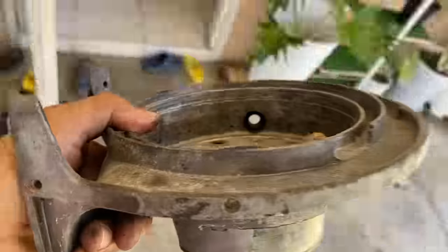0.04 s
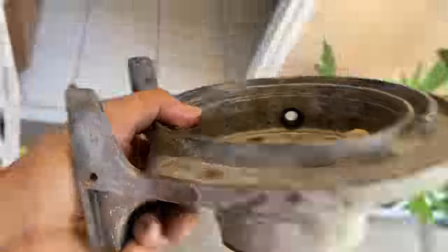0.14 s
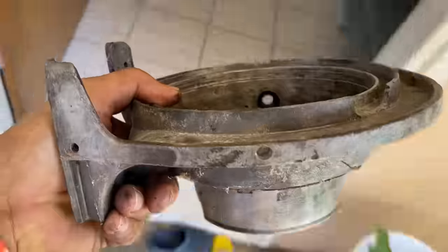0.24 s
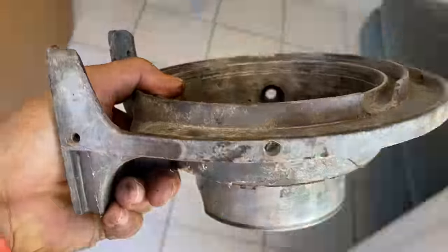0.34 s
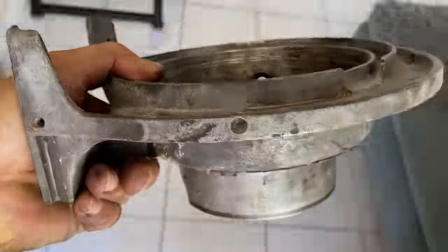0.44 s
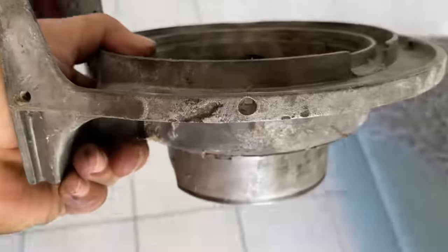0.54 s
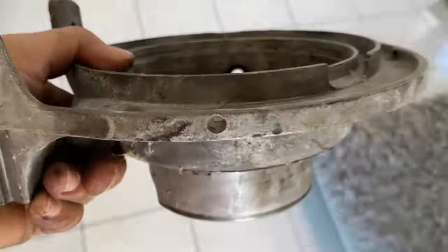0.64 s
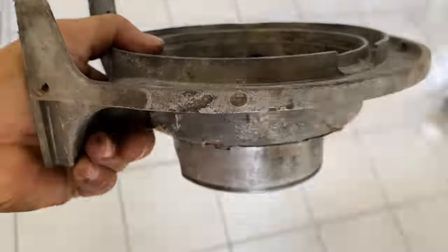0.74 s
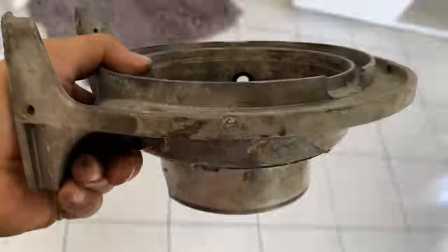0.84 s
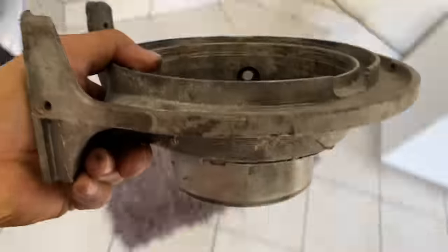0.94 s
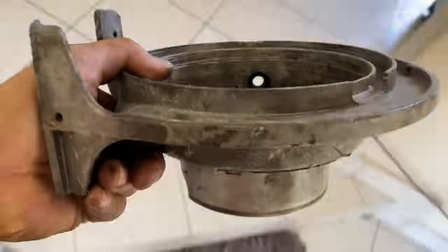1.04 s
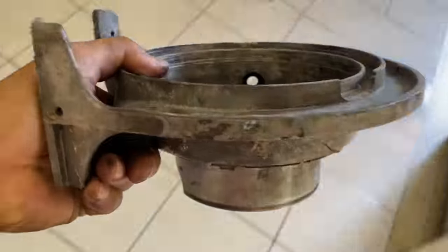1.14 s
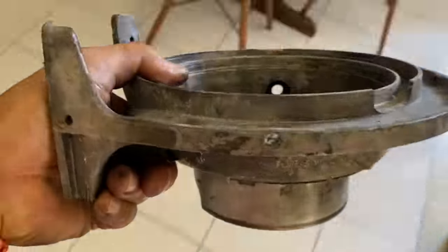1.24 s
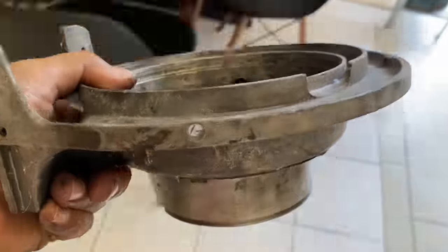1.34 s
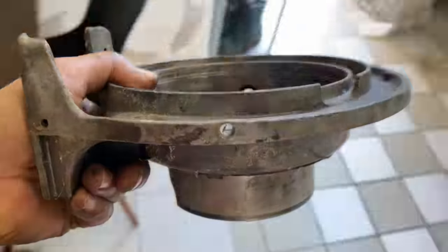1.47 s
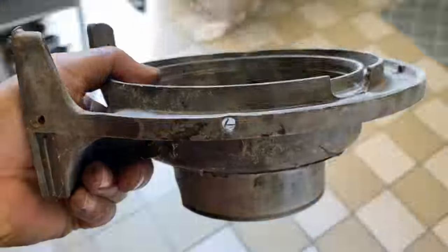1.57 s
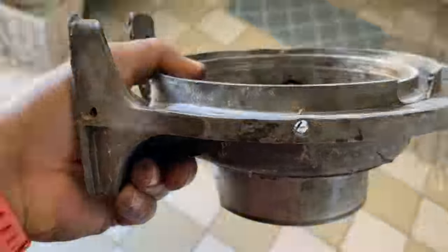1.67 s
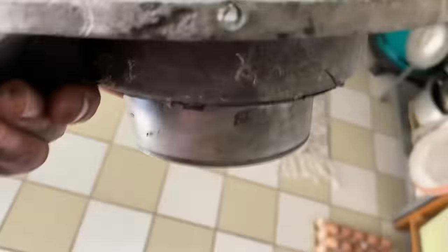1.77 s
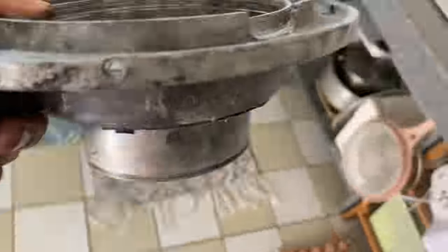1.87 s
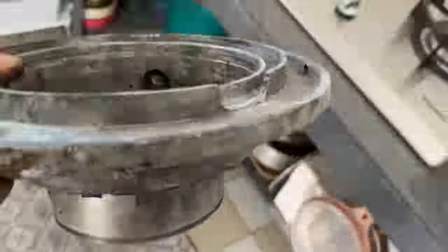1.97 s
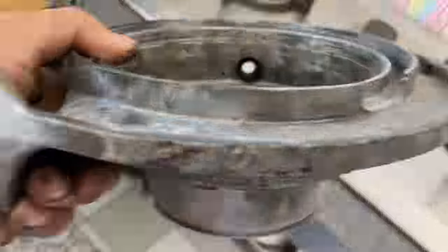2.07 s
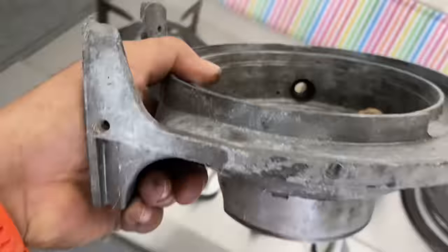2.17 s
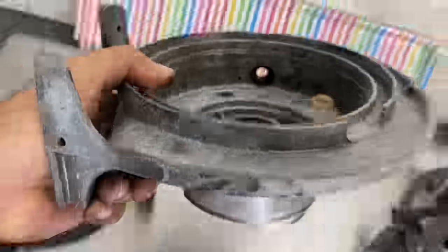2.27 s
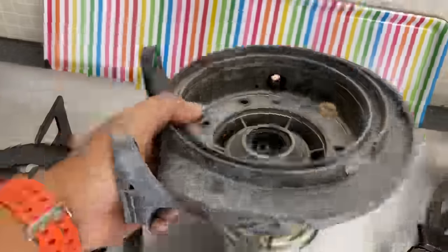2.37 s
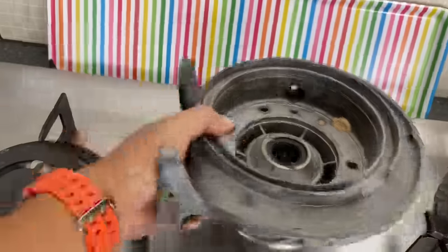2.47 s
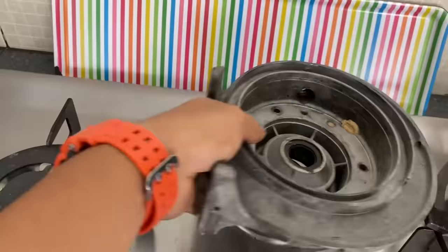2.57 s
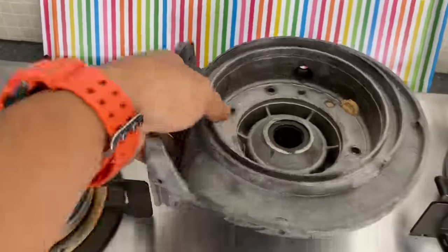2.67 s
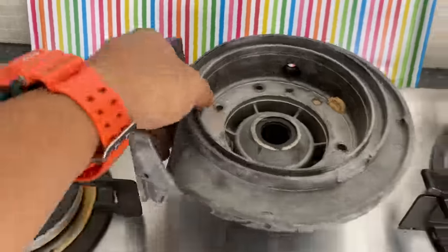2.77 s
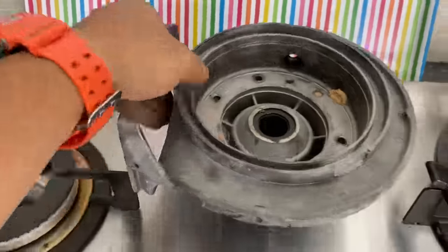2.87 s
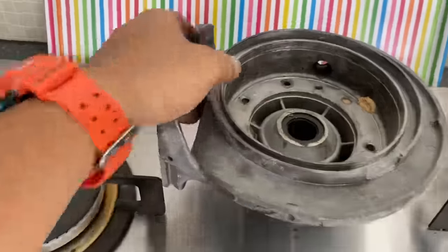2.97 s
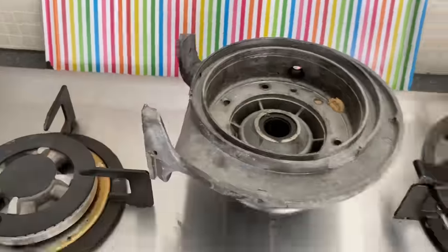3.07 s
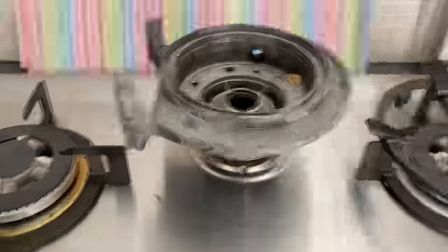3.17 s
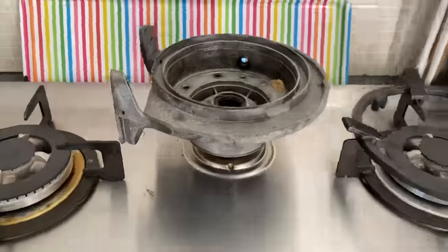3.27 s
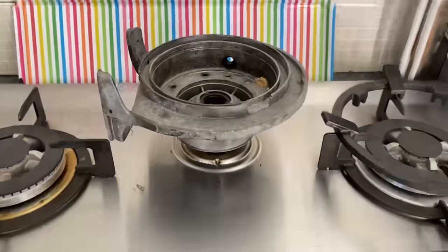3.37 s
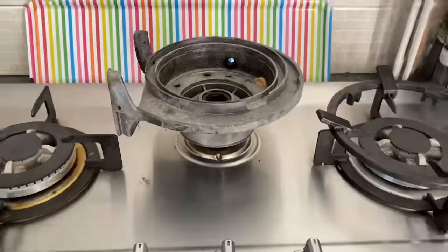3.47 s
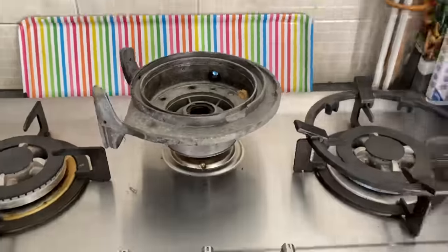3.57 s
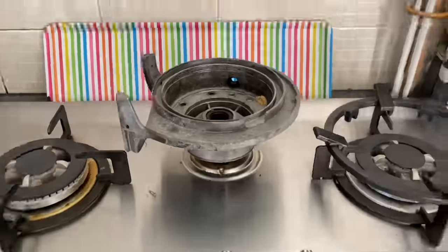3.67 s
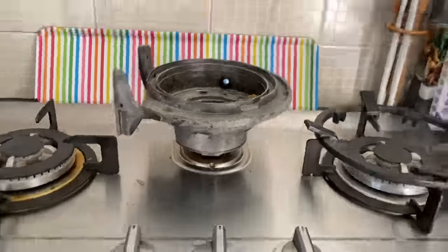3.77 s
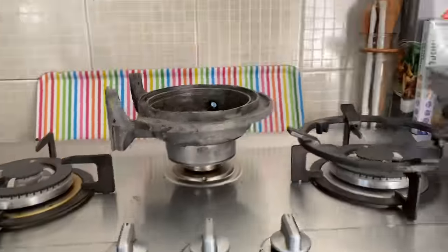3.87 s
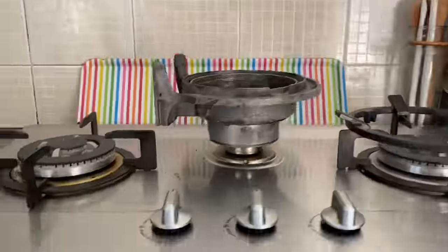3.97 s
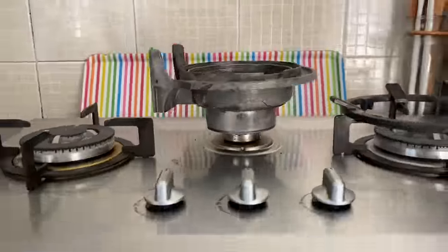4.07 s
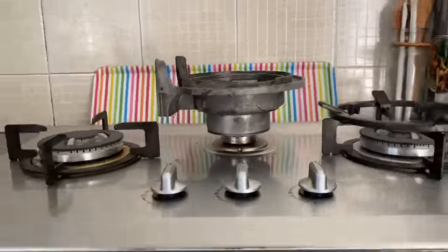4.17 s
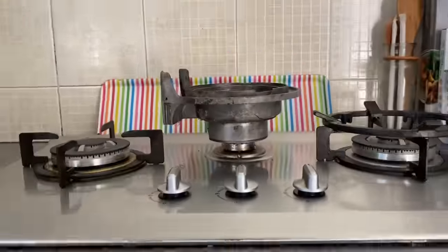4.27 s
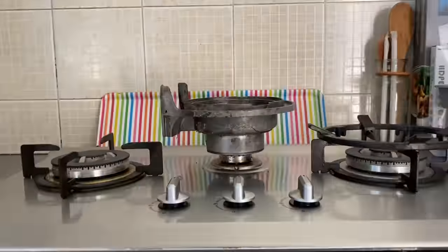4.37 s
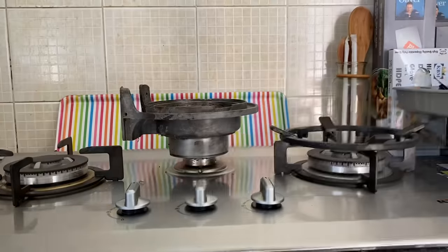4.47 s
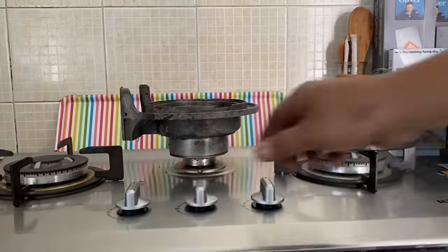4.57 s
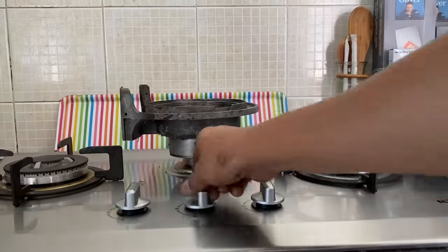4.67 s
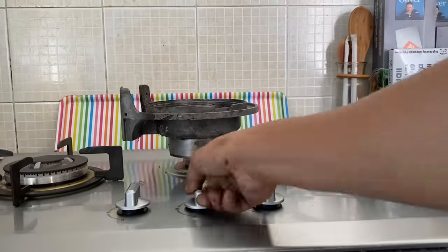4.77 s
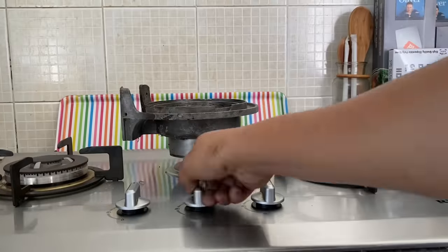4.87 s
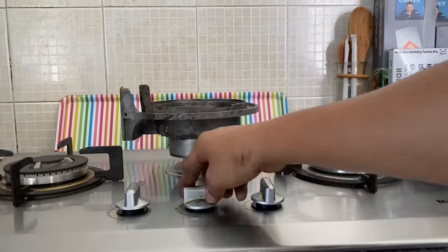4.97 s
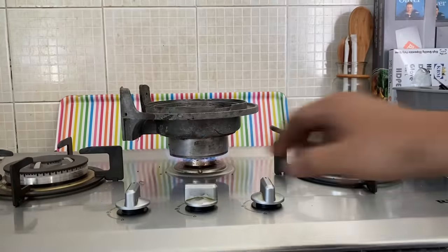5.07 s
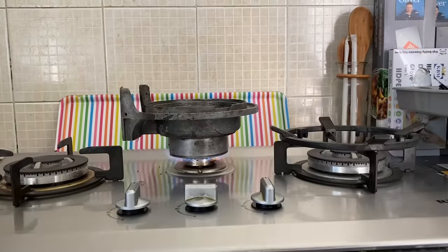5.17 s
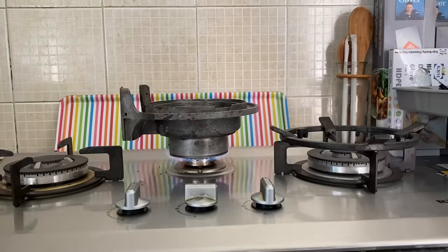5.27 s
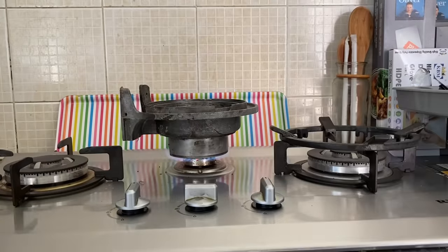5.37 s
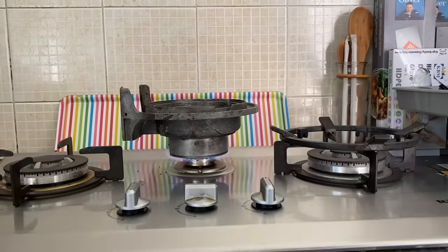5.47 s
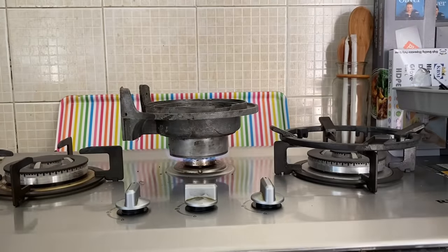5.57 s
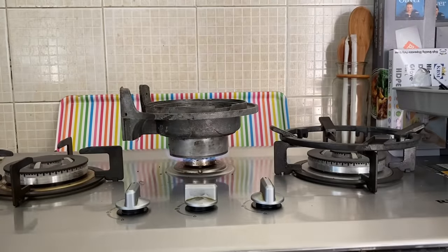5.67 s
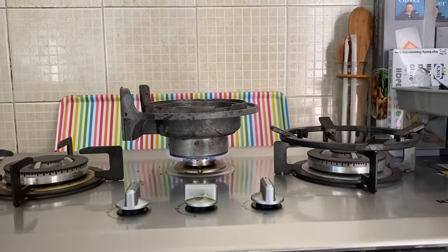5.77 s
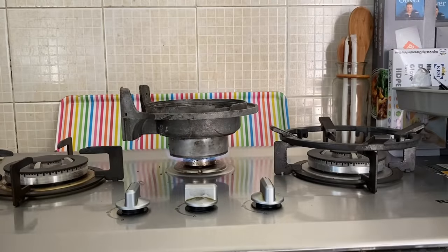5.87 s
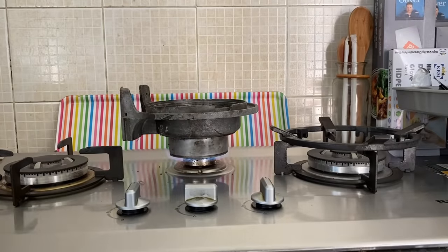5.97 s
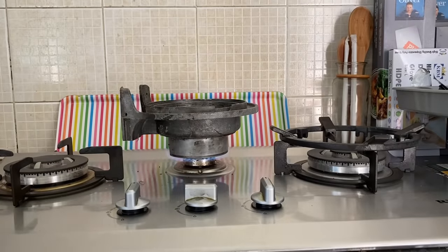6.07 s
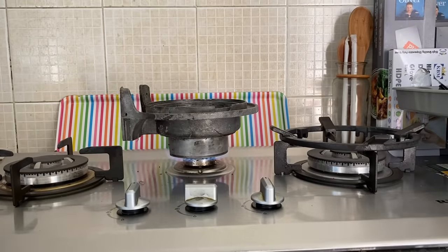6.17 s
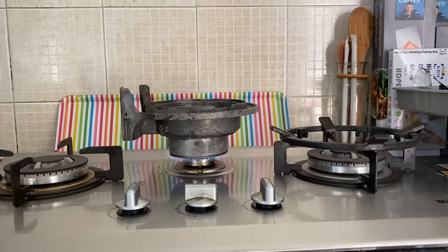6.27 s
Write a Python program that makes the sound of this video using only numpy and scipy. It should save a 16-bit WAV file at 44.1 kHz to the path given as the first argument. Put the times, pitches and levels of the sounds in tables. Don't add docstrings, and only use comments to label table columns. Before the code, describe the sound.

Close handheld phone sound, sped up. Slippers scuff, squeak and thud softly while clothes rustle, from a hallway into a tiled kitchen with a low appliance hum. A heavy cast metal part lands on a steel hob with a double booming clank, grinding and rocking briefly. After faint sleeve rustles, a knob is pressed and turned: hard panel-ringing clicks, spark snaps, then a very faint steady gas hiss.

```python
import sys
import numpy as np
from scipy import signal
from scipy.fft import rfft, irfft
from scipy.io import wavfile
from scipy.ndimage import uniform_filter1d, map_coordinates

SR = 44100
rng = np.random.default_rng(int(sys.argv[2]) if len(sys.argv) > 2 else 0)


def voltage_ratio(level):
    return 10 ** (np.asarray(level, float) / 20)


def generate_wav(signal):
    frames = np.transpose(np.atleast_2d(signal))
    scaled = np.clip(frames, -1, 1) * 32767
    pcm = np.round(scaled).astype(np.int16)
    wavfile.write(sys.argv[1], SR, pcm)


N = 278712
T = np.arange(N) / SR
KITCHEN_S = 1.2


def unit(x):
    return x / np.sqrt(np.mean(x ** 2) + 1e-20)


def slope(points):
    f, v = np.transpose(points)
    return lambda hz: voltage_ratio(np.interp(np.log(hz + 1), np.log(f + 1), v, left=-120, right=-120))


def modes(peaks):
    def gain(f):
        total = 0
        for k, (centre, width, db) in enumerate(peaks):
            damping = 1j * f * width
            total = total + (-1) ** k * voltage_ratio(db) * damping / (centre * centre - f * f + damping)
        return total
    return gain


def noise(gain, patchy_db, alike=0):
    hz, _, z = signal.stft(rng.standard_normal((2, N)), SR, nperseg=1024)
    z = z + alike * z[::-1]
    field = uniform_filter1d(rng.standard_normal(z.shape[1:]), 9, 0)
    field = uniform_filter1d(field, 2, 1)
    patches = voltage_ratio(patchy_db * unit(field))
    coloured = signal.istft(z * gain(hz)[:, None] * patches, SR, nperseg=1024)[1]
    return unit(coloured[:, :N])


def wobble(rate):
    return map_coordinates(rng.standard_normal(int(N * rate / SR) + 4), [T * rate])


def grain():
    return unit(voltage_ratio(2 * wobble(500)))


def smear(s, length, rise):
    first = max(round((s - 0.04) * SR), 0)
    t = T[first:first + SR // 5] - s
    length = max(length, 0.003)
    before = np.exp(-(t / (rise * length)) ** 2)
    after = np.exp(-(np.abs(t) / length) ** 1.46)
    return first, np.where(t < 0, before, after)


def bursts(times, levels_db, lengths, rise, pan_db=0):
    env = np.zeros((2, N))
    sides_db = np.array([[pan_db / 2], [-pan_db / 2]])
    for s, db, length in zip(times, levels_db, lengths):
        first, shape = smear(s, length, rise)
        env[:, first:first + len(shape)] += voltage_ratio(db + sides_db) * shape
    return env


def tones(times, levels_db, pitches_hz, lengths, rise, slip):
    out = np.zeros((2, N))
    lead = slip / 2 * rng.choice([-1, 1], len(times))
    for s, db, hz, length, half in zip(times, levels_db, pitches_hz, lengths, lead):
        first, shape = smear(s, length, rise)
        t = T[first:first + len(shape)] - s
        phase = 2 * np.pi * hz * t + np.array([[half], [-half]])
        out[:, first:first + len(shape)] -= voltage_ratio(db) * shape * np.cos(phase)
    return out


def linger(times, levels_db, length):
    power = sum(bursts([s], [db], [length], rise=0.33) ** 2 for s, db in zip(times, levels_db))
    return np.sqrt(power)


def microphone():
    return voltage_ratio(-98.5) * rng.standard_normal((2, N))


# pitch_hz, level_db
WHINE = [(6142, -88.5)]


def whine():
    (whine_hz, whine_db), = WHINE
    drift = 2.2 * np.array([wobble(45), wobble(45)])
    level_db = whine_db + 7 - 12 * (T < KITCHEN_S) + 1.8 * wobble(14)
    return voltage_ratio(level_db) * np.sin(2 * np.pi * whine_hz * T + drift)


# pitch_hz, level_db (per Hz)
HALL = [(200, -40), (300, -2), (450, 0), (700, -8), (1100, -25)]


def hall():
    fade = np.clip((KITCHEN_S - T) / 0.27, 0, 1)
    return voltage_ratio(-67.5) * fade * noise(slope(HALL), patchy_db=2)


# pitch_hz, level_db (per Hz)
HUM = [(35, -45), (60, -13), (101, -5.5), (129, -10), (199, -4.5), (271, -10.5), (314, -19.5), (412, -15.5),
       (452, -16.5), (497, -22.5), (725, -25.5), (796, -24.5), (1500, -40.5), (1950, -76), (3300, -120)]
# start_s, level_db
PASSING = [
    (0.0, -60.5),
    (1.17, -56),
    (1.25, -51.5),
    (1.45, -52.5),
    (1.67, -55),
    (6.32, -55),
]


def hum():
    boom, click = np.transpose(BOOMS), np.transpose(CLICKS)
    hit_db = np.r_[boom[1], click[1] + click[2] - 3]
    drone = linger(np.r_[boom[0], click[0]], hit_db - 27, length=0.083)
    house = voltage_ratio(np.interp(T, *np.transpose(PASSING)))
    return (house + drone) * noise(slope(HUM), patchy_db=1.5)


# start_s, level_db (of rustle)
MOTION = [(0.0, -66.5), (0.28, -63.5), (0.39, -61.5), (0.54, -68), (0.69, -75.5), (0.84, -73.5),
          (1.14, -71.5), (1.67, -73), (1.99, -72.5), (2.2, -72), (2.32, -75.5), (3.0, -74), (3.43, -80.5),
          (4.17, -79.5), (4.9, -78), (5.49, -76), (5.76, -79.5), (6.07, -74.5)]
# centre_s, half_length_s, level_db
LULLS = [
    (.69, 0.027, -2),
    (0.81, 0.022, -1.5),
    (0.952, .012, -4),
    (1.074, 0.018, -5.5),
    (1.73, 0.023, -2),
    (1.908, .035, -4.5),
    (2.184, 0.021, -4),
    (3.33, 0.046, -1.5),
]
CALM_DB = -75


def motion():
    over_calm_db = np.interp(T, *np.transpose(MOTION)) - CALM_DB
    for s, half, db in LULLS:
        over_calm_db += db * np.exp(-((T - s) / half) ** 2)
    return over_calm_db


# pitch_hz, level_db (per Hz)
RUMBLE = [(12, -41), (20, -14), (38, -13), (65, -2.5), (87, -5), (130, -21.5), (170, -57.5), (290, -120)]


def rumble(motion_db):
    thud = np.transpose(THUDS)
    sway = linger(thud[0], 0.51 * thud[1] - 38.5, length=0.11)
    return (voltage_ratio(-67 + 0.35 * motion_db) + sway) * noise(slope(RUMBLE), patchy_db=1.5, alike=0.18)


# pitch_hz, level_db (per Hz)
RUSTLE = [(410, -17), (700, -5.5), (894, -9), (1660, -7), (2040, -10), (2830, -10.5), (4000, -13),
          (6010, -13.5), (8000, -25), (10400, -52.5), (17600, -120)]
# pitch_hz, level_db (per Hz)
HISS = [(3820, -41), (6500, -7.5), (7960, -4.5), (9440, -2.5), (11700, -5), (13200, -7.5), (15700, -9)]


def clothes(motion_db):
    clunk, click = np.transpose(CLUNKS), np.transpose(CLICKS)
    rattle = linger(np.r_[clunk[0], click[0]], np.r_[clunk[1], click[1] - 6] - 36, length=0.044)
    flutter = wobble(30)
    rustle_level = voltage_ratio(CALM_DB + motion_db + 4.5) + rattle
    hiss_level = voltage_ratio(-82 + 2.4 * np.minimum(motion_db, 4)) + voltage_ratio(-17.5) * rattle
    rustle = rustle_level * voltage_ratio(0.59 * flutter) * noise(slope(RUSTLE), patchy_db=1.5)
    hiss = hiss_level * voltage_ratio(3.6 * flutter) * noise(slope(HISS), patchy_db=2.2)
    return rustle + hiss


# start_s, level_db (peak), high_db,
# length_s
SCUFFS = [(0.024, -50.5, -8.5, 0.041), (0.114, -47.5, -11, 0.045), (0.219, -46.5, -6.5, 0.027),
          (0.293, -44, -4, 0.022), (0.318, -45.5, -33, 0.019), (0.343, -51.5, -4, .017),
          (0.39, -47, -13, 0.018), (0.395, -40.5, -6, 0.0081), (0.425, -45, -9.5, 0.021),
          (0.52, -48.5, -15, .012), (0.536, -40.5, -11.5, .011), (0.641, -57.5, -5, 0.015),
          (0.741, -49, -15.5, 0.024), (0.834, -50.5, -8.5, 0.013), (0.907, -54.5, -20, 0.028),
          (0.928, -51, -25, 0.012), (0.969, -54, -7, 0.015), (1.018, -50, -5.5, 0.016),
          (1.042, -49, -33, .011), (1.11, -49, -18, 0.012), (1.29, -49, -10.5, 0.027),
          (1.439, -43, -16, 0.014), (1.583, -65, 9, 0.01), (1.6218, -47, -27, 0.014), (1.656, -44, -20, .005),
          (1.226, -55, -15, .01), (1.362, -63, -2, 0.0081), (2.105, -61, -7, .01), (2.329, -59, -12, 0.009),
          (1.687, -49, -20, 0.023), (1.777, -54.5, 1.5, 0.028), (1.84, -52.5, -5.5, 0.021),
          (1.982, -49.5, -13, 0.022), (2.156, -47.5, -14, 0.01), (2.36, -50, -12.5, 0.036),
          (2.263, -58, -5.5, .013), (3.095, -57, -11.5, 0.03), (3.225, -62.5, -5, 0.028),
          (3.264, -59, -4, .009), (3.52, -62, -22, .03), (3.615, -69, -4, 0.014), (3.697, -67, -9, .008),
          (4.12, -65, -27, .05), (5.49, -67, -8, .02), (5.81, -62, -20, 0.032), (3.58, -61, -7.5, 0.033),
          (3.764, -60, -20, 0.047), (3.83, -54.5, -17, 0.021), (3.879, -56.5, -17, 0.02),
          (3.915, -57.5, -14, 0.032), (3.955, -64, -7, 0.023), (4.226, -45, -4, 0.021),
          (4.257, -53.5, -31, .06), (4.302, -43, -5, .016), (4.3874, -56, -31, 0.024),
          (4.514, -65, -5, 0.023), (4.532, -57, -12, 0.031), (4.599, -63, -2, 0.032), (4.678, -61, 4, .02),
          (4.754, -65, -4, 0.011), (6.015, -59, -11, 0.019), (6.053, -46, -16, 0.012),
          (6.098, -51.5, -15.5, 0.043), (6.194, -58, -12, 0.038)]
# start_s, level_db, pitch_hz
SQUEAKS = [(.322, -55.5, 1940), (.345, -53, 3700), (0.318, -54, 2900), (.384, -47, 1300),
           (0.422, -46, 3000), (.426, -48, 3400), (.54, -59, 1750), (.747, -51, 2540), (1.444, -53, 3050),
           (1.99, -53, 2700), (1.912, -63, 11200), (1.693, -53, 1400), (1.785, -50.5, 9700),
           (3.918, -60, 1650), (3, -60, 9600), (1.774, -54, 10400), (4.392, -64, 4300),
           (1.659, -56.5, 3270), (6.115, -59, 2530), (3.51, -70, 9200), (3.203, -69, 3100),
           (3.885, -63, 1680), (3.545, -65, 2800), (6.09, -62, 2450), (1.588, -57, 9400)]
# start_s, level_db (peak), pitch_hz, length_s
THUDS = [(0.403, -48, 53.8, 0.026), (0.593, -47, 80.7, 0.016), (.28, -56, 75, 0.017), (.645, -52, 70, .015),
         (.69, -55, 62, 0.016), (0.861, -53, 70, .012), (.95, -54, 45, .015), (0.901, -44.5, 67, 0.017),
         (1.005, -37, 64.5, 0.012), (1.043, -49, 45.8, 0.014), (1.774, -52, 56, 0.018),
         (2.54, -23.5, 78.5, 0.0098), (2.589, -19, 96, 0.0069), (3.075, -47, 84, 0.022),
         (3.21, -51.5, 60, .04), (3.61, -51, 55, .025), (3.665, -49, 88.8, 0.0081),
         (3.703, -32.5, 87, 0.0077), (4.719, -33.5, 81, 0.014), (4.786, -43.5, 113, 0.016),
         (4.921, -35, 84.4, 0.016), (4.974, -38.5, 62.3, 0.01), (5.027, -30.5, 92, 0.018),
         (5.2, -52.5, 70, 0.019), (.46, -47.5, 50, 0.045), (0.534, -47.5, 66.3, 0.1)]


def steps():
    s, db, high_db, length = np.transpose(SCUFFS)
    s, length = s + 0.0046, 0.82 * length
    scrape = bursts(s, db - 9, length, rise=0.74, pan_db=4) * grain() * noise(slope(RUSTLE), patchy_db=1.5)
    swish = bursts(s, db + high_db - 6.5, length, rise=0.56)
    swish = swish * noise(slope(HISS), patchy_db=2.5, alike=0.072)
    s, db, hz = np.transpose(SQUEAKS)
    squeak = tones(s, db, hz, np.full(len(s), 0.003), rise=1, slip=1.5)
    s, db, hz, length = np.transpose(THUDS)
    thud = tones(s + 0.0011, db + 1.5, hz, length, rise=0.36, slip=0.89)
    return scrape + swish + squeak + thud


# start_s, level_db (peak), pitch_hz, length_s
KNOCKS = [
    (0.025, -56, 452, 0.012),
    (0.194, -53.5, 542, 0.011),
    (0.29, -55.5, 318, 0.023),
    (0.385, -47.5, 510, 0.0081),
    (1.779, -35, 468, 0.0056),
    (3.198, -47, 375, 0.0046),
    (3.433, -52.5, 327, 0.0066),
    (4.499, -46.5, 480, 0.0034),
    (5.134, -57, 400, 0.0081),
]
# pitch_hz, level_db (per Hz)
WOOD = [(350, -40), (600, -15), (1180, -2), (2330, -27), (3230, -13), (4000, -41), (5200, -68),
        (8800, -120)]


def knocks():
    s, db, hz, length = np.transpose(KNOCKS)
    s = s + 0.0025
    edge = bursts(s, db - 15, length, rise=0.9) * noise(slope(WOOD), patchy_db=1.5)
    upper = tones(s, db, hz, length, rise=0.56, slip=0.78)
    lower = tones(s, db - 3, 0.588 * hz, length, rise=0.99, slip=1.5)
    return edge + upper + lower


# start_s, level_db, pitch_hz, length_s
PINGS = [(1.589, -60, 11500, 0.0078), (1.785, -49.5, 11500, 0.0051), (1.784, -50, 1170, 0.0047),
         (1.779, -45, 926, 0.0035), (2.595, -30, 1030, 0.008), (2.598, -42, 7660, 0.0063),
         (2.652, -28.5, 2316, 0.0031), (2.653, -47, 4550, 0.0029), (2.706, -46, 500, 0.0091),
         (2.930, -61, 2810, 0.025), (3.025, -69.5, 5550, 0.014), (3.028, -61, 2060, 0.011),
         (4.384, -63, 1313, 0.025), (5.305, -67, 3260, 0.0073), (4.26, -61, 7050, 0.008),
         (4.258, -64, 14200, .006), (4.633, -48.5, 9500, 0.004), (4.72, -42, 7400, 0.0031),
         (4.984, -24.5, 3150, 0.0049), (4.724, -30.5, 1540, 0.0057), (4.989, -29, 550, 0.0089),
         (4.996, -33.5, 100, 0.0057), (4.987, -34, 1030, 0.0069), (5.059, -36, 310, .006)]
# start_s, level_db, pitch_hz, length_s
OPPOSED = [
    (2.541, -21, 215, .008),
    (2.544, -30, 587, .008),
    (2.592, -22, 581, .01),
    (2.597, -29, 1997, .011),
    (2.596, -32, 1330, .011),
    (2.735, -39, 600, .009),
    (4.721, -33, 200, .009),
    (4.989, -23, 522, .008),
    (4.989, -25, 1028, .008),
    (4.987, -24, 264, .008),
]


def pings():
    alike = tones(*np.transpose(PINGS), rise=0.9, slip=1.38)
    return alike + tones(*np.transpose(OPPOSED), rise=0.9, slip=np.pi)


# pitch_hz, width_hz, level_db
JETS = [(1710, 40, -3), (2196, 50, 1), (2410, 40, -3)]


def flame():
    hiss = voltage_ratio(-87) * noise(slope(SPARK), patchy_db=1)
    jets = voltage_ratio(-83 + 3 * wobble(6)) * noise(lambda hz: modes(JETS)(hz) ** 2, patchy_db=1)
    return np.clip((T - 5.06) / 0.1, 0, 1) * (hiss + jets)


# start_s, level_db (peak), pitch_hz, length_s
BOOMS = [(2.545, -24.5, 376, 0.008), (2.604, -29, 280, 0.0035), (2.559, -33, 110, 0.0055),
         (2.589, -17.5, 297, 0.0083), (2.595, -16, 194, 0.0049), (2.636, -22.5, 227, 0.0084),
         (2.665, -19, 250, 0.0054), (2.679, -28, 218, 0.023), (2.705, -24, 308, 0.0076),
         (2.743, -30.5, 258, 0.0034), (2.798, -36, 220, 0.016), (2.879, -30.5, 290, 0.0044),
         (2.89, -31, 257, 0.0034), (2.955, -32.5, 200, 0.0045), (2.918, -31, 270, 0.0026),
         (2.935, -25.5, 218, 0.012), (3.011, -34.5, 217, 0.006)]
# start_s, clank_db, grit_db, length_s
CLUNKS = [(2.541, -28, -16.5, 0.015), (2.591, -18, -16, 0.016), (2.638, -44, -13, 0.0094),
          (2.654, -31, -5, 0.016), (2.701, -27, -16.5, 0.014), (2.736, -36, -14.5, 0.0087),
          (2.776, -49, -12, 0.017), (2.838, -48.5, -11, 0.015), (2.876, -39.5, -14.5, 0.012),
          (2.912, -41, -11, 0.009), (2.932, -44, -12, 0.018), (2.961, -40.5, -6.5, 0.016),
          (3.004, -47, -29, 0.015)]
# pitch_hz, width_hz, level_db
CASTING = [(680, 55, 0.5), (895, 34, -10.5), (1043, 43, -6.5), (1500, 68, -11), (1678, 34, -7),
           (2310, 140, -14), (2806, 41, -12.5), (3200, 50, -19.5), (3460, 46, -19), (4370, 75, -23.5)]
# pitch_hz, level_db (per Hz)
GRIT = [(1470, -25), (2300, -11), (3520, -4), (4600, -4), (6760, -17), (7890, -27), (8080, -13.5),
        (9440, -12), (9960, -18), (10800, -14), (12700, -18), (16000, -29.5)]
# start_s, level_db, pitch_hz, length_s
CASTING_RINGS = [(2.545, -42, 1047, 0.0059), (2.545, -38, 556, 0.0075), (2.59, -30, 520, .005),
                 (2.596, -28, 682, 0.012), (2.599, -35.5, 1685, .009), (2.596, -44, 3000, .008),
                 (2.686, -36, 490, .008), (2.699, -32, 887, 0.0048), (2.712, -37, 930, 0.0058),
                 (2.713, -40, 1041, 0.0066), (2.982, -62, 3800, 0.009), (2.855, -43, 170, .006),
                 (2.62, -49, 1341, .012), (2.708, -43, 1402, .008), (2.664, -40.5, 1497, 0.0073),
                 (2.88, -45, 390, .006), (2.964, -50.5, 1440, 0.006), (2.966, -54, 4420, 0.0057),
                 (3.012, -44.5, 542, .006)]


def casting():
    boom = tones(*np.transpose(BOOMS), rise=0.82, slip=1.05)
    s, db, grit_db, length = np.transpose(CLUNKS)
    clank = bursts(s + 0.0023, db - 9.5, length, rise=0.64) * noise(modes(CASTING), patchy_db=0)
    grit = bursts(s + 0.003, db + grit_db - 7, 0.73 * length, rise=0.82, pan_db=2.1)
    grit = grit * noise(slope(GRIT), patchy_db=2.2)
    shake = bursts(s + 0.0027, db - 9.5, length, rise=0.76) * noise(slope(PANEL), patchy_db=3)
    ring = linger(s + 0.0049, db - 25, length=0.041)
    ring = ring * noise(lambda hz: modes(CASTING)(hz) ** 2 * hz, patchy_db=1)
    notes = tones(*np.transpose(CASTING_RINGS), rise=0.9, slip=1.38)
    return boom + shake + ring + notes + grain() * (clank + grit)


# start_s, click_db, body_db, spark_db, length_s
CLICKS = [(4.63, -59, -14, 6, .011), (4.658, -34.5, -36, -18.5, 0.012), (4.707, -32, -13, -18, 0.015),
          (4.7182, -20.5, -6, -16, .012), (4.748, -43.5, -4, -26, 0.013), (4.786, -24.5, -4, -23, 0.013),
          (4.815, -30, -7.5, -27, 0.009), (4.8393, -36.5, -7, -22, 0.011), (4.906, -27, -4, -19, 0.016),
          (4.925, -45.5, 1, -9.5, 0.014), (4.945, -32, -3, -28, 0.007), (4.9812, -7.5, -14.5, -15, .011),
          (4.996, -28, -14, -16, 0.011), (5.018, -44, -20, -8, 0.013), (5.021, -40.5, -3, -1, 0.019),
          (5.042, -23, -4.5, -30, 0.011), (5.071, -48, -1, -35, 0.0085)]
# pitch_hz, level_db (per Hz)
PANEL = [(76, -40.5), (130, -2), (269, -5), (317, -8), (524, -1), (650, -4.5), (706, -3.5), (942, -8),
         (1200, -10.5), (1560, -24.5), (2640, -120)]
# pitch_hz, level_db (per Hz)
KNOB = [(470, -37.5), (800, -11.5), (1240, -1), (1430, -6), (1840, -2.5), (2360, -7.5), (3150, -9.5),
        (5500, -19), (7150, -39), (12100, -120)]
# pitch_hz, level_db (per Hz)
SPARK = [(2350, -33), (4000, -6.5), (5870, -2.5), (7130, -9), (8080, -6), (10100, -10.5), (11900, -10),
         (12900, -8.5), (15000, -9), (15800, -12)]
# start_s, level_db, pitch_hz, length_s
PANEL_RINGS = [(4.705, -43, 1320, .008), (4.703, -48, 825, .006), (4.724, -31, 520, .007),
               (4.724, -33, 770, .006), (4.724, -38, 2790, .005), (4.736, -36, 400, .004),
               (4.748, -44, 550, .006), (4.792, -33, 1023, .007), (4.796, -31, 535, .006),
               (4.793, -38, 790, .005), (4.795, -34, 165, .006), (4.792, -45, 1884, .006),
               (4.792, -46, 2810, .005), (4.821, -41, 1064, .006), (4.823, -40, 580, .006),
               (4.815, -40, 150, .008), (4.909, -33, 130, .007), (4.91, -44, 1235, .01),
               (4.922, -38, 545, .007), (4.948, -36, 898, .006), (4.951, -34, 531, .005),
               (4.984, -26, 1232, .008), (4.985, -25, 1840, .008), (4.988, -28, 2030, .009),
               (4.987, -31, 2140, .009), (4.986, -30, 1120, .007), (4.986, -28.5, 670, .008),
               (4.984, -28, 235, .007), (4.988, -35, 3650, .008), (4.987, -31, 4300, .007),
               (5.049, -32, 481, .006), (5.049, -32, 628, .006), (5.051, -32, 777, .008),
               (5.047, -35, 1118, .006), (5.047, -37, 1900, .005), (5.082, -44, 210, .005),
               (4.721, -48, 14800, .003), (4.721, -49, 13700, .003), (4.745, -58, 8350, .015),
               (4.633, -56, 10200, .004), (4.98, -40, 8050, .006), (4.984, -43, 12400, .005),
               (4.979, -43, 14700, .004), (4.912, -59, 7900, .008), (5.035, -59, 10000, .02)]


def knob():
    s, db, body_db, spark_db, length = np.transpose(CLICKS)
    s = s + 0.0036
    click = bursts(s, db - 13.5, length, rise=0.72, pan_db=2.5) * noise(slope(KNOB), patchy_db=1.5)
    body = bursts(s + 0.0025, db + body_db - 6.5, 1.29 * length, rise=0.52)
    body = body * noise(slope(PANEL), patchy_db=3.5)
    spark = bursts(s - 0.001, db + spark_db - 5, 0.7 * length, rise=0.76)
    spark = spark * noise(slope(SPARK), patchy_db=0, alike=0.17)
    notes = tones(*np.transpose(PANEL_RINGS), rise=0.9, slip=1.38)
    return body + notes + grain() * (click + spark)


def scene():
    motion_db = motion()
    background = microphone() + whine() + hall() + hum()
    carrier = rumble(motion_db) + clothes(motion_db) + steps()
    hob = flame() + casting() + knob()
    return background + carrier + knocks() + pings() + hob


def low_pass(x):
    return signal.sosfilt(signal.butter(12, 16400, fs=SR, output="sos"), x)


def record(dry):
    in_band = np.fft.rfftfreq(N, 1 / SR) < 15830
    kept = irfft(rfft(dry) * in_band, N)
    return low_pass(kept)


dry = scene()
out = record(dry)
generate_wav(out)
```